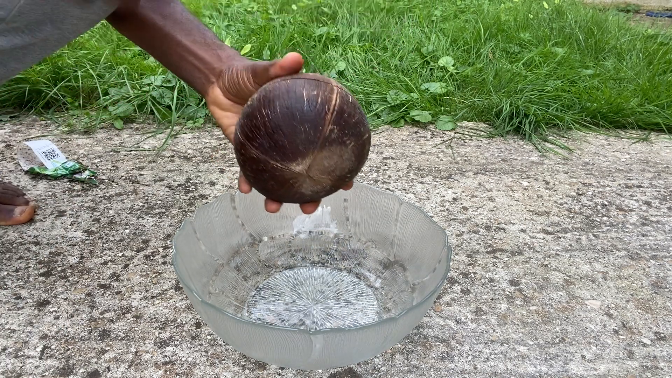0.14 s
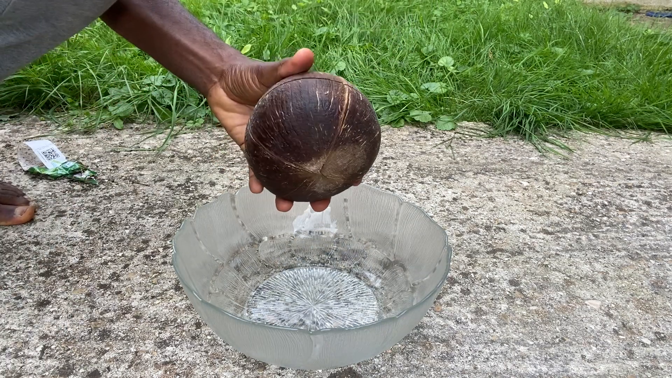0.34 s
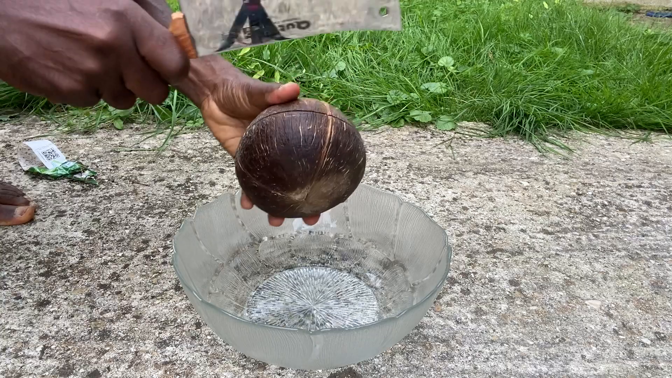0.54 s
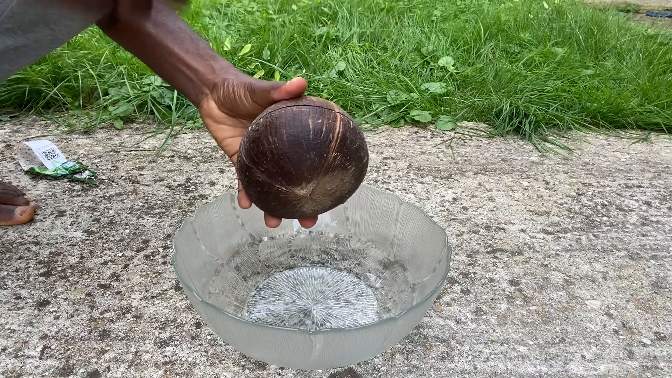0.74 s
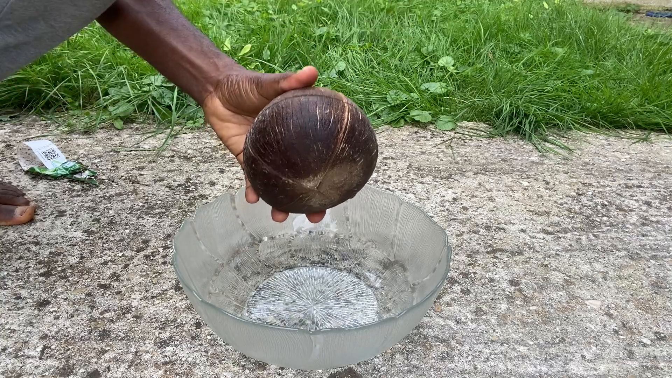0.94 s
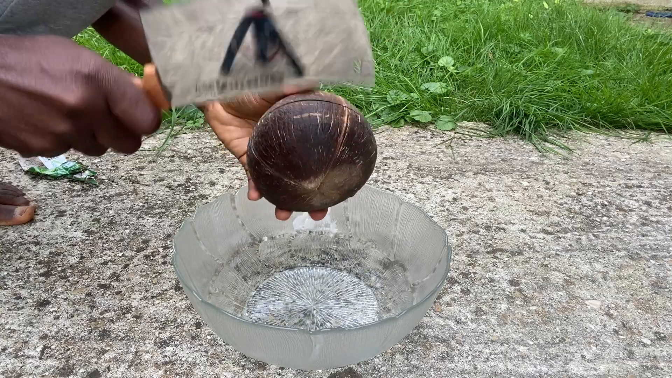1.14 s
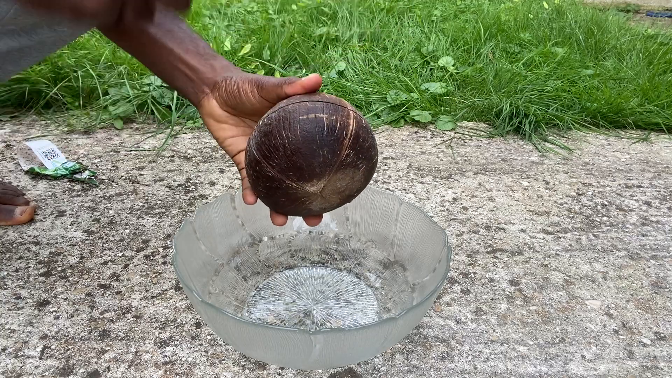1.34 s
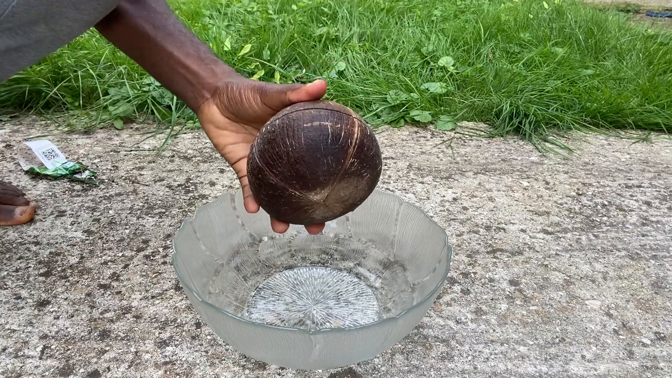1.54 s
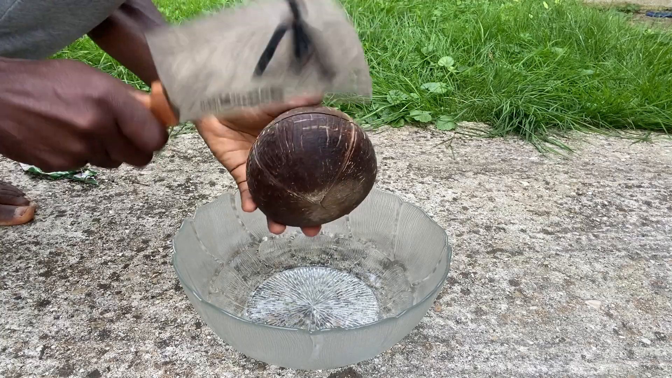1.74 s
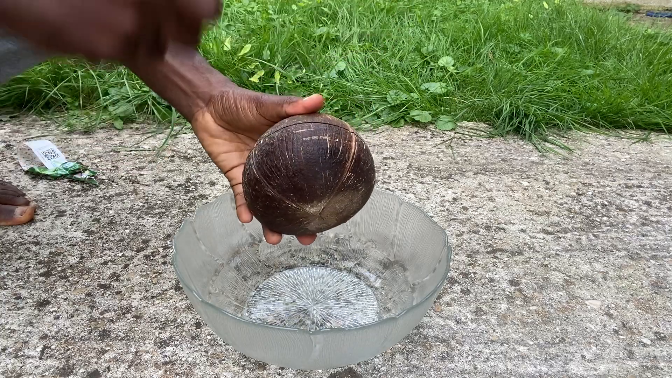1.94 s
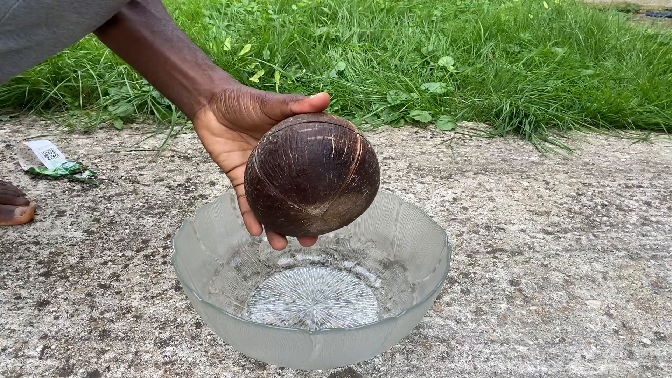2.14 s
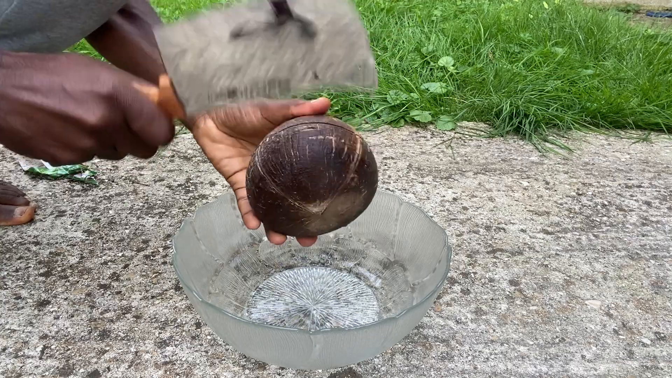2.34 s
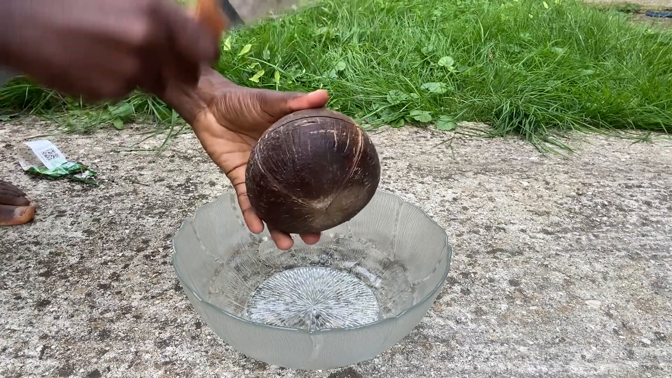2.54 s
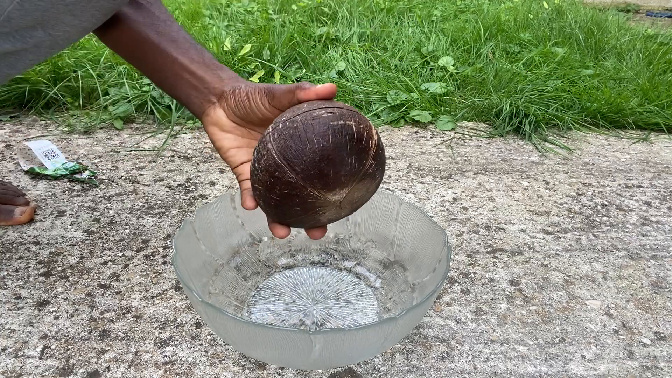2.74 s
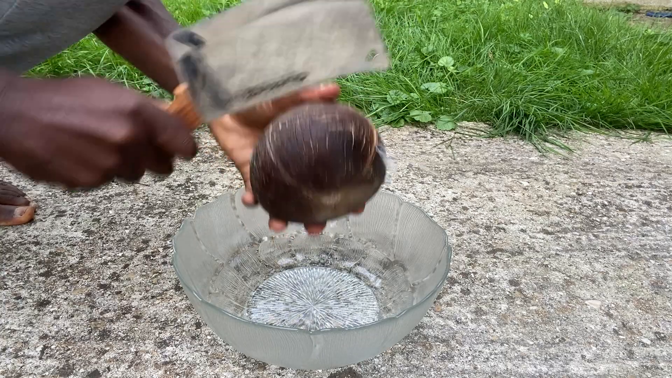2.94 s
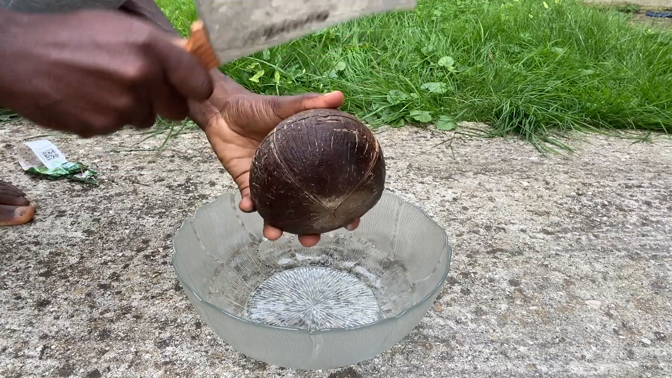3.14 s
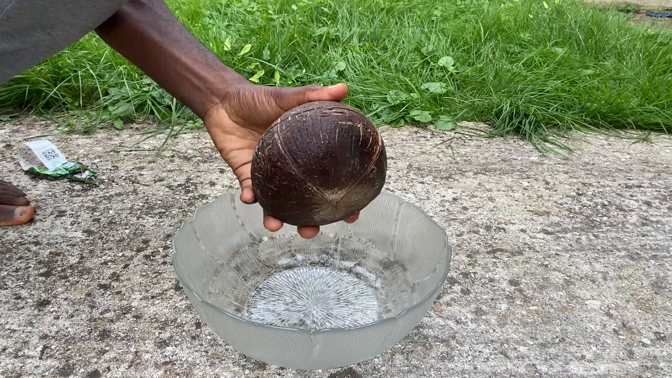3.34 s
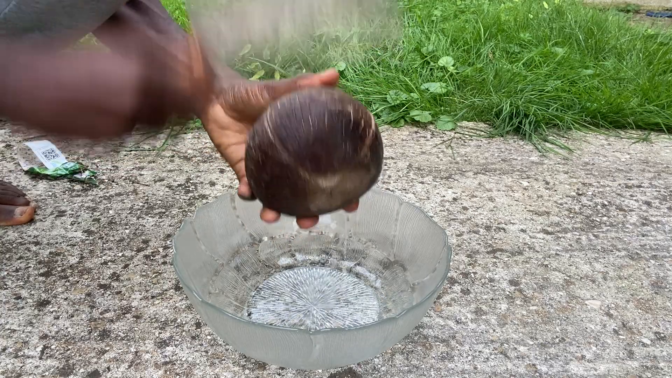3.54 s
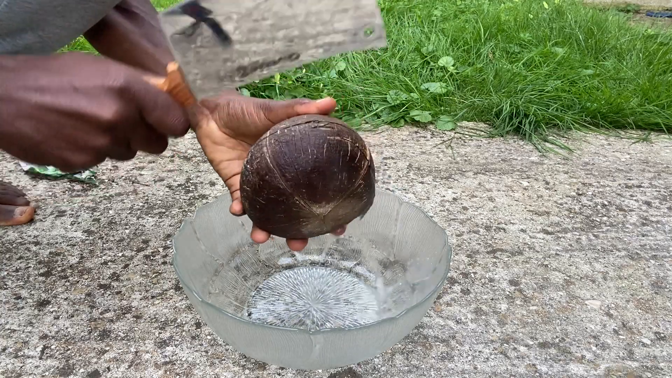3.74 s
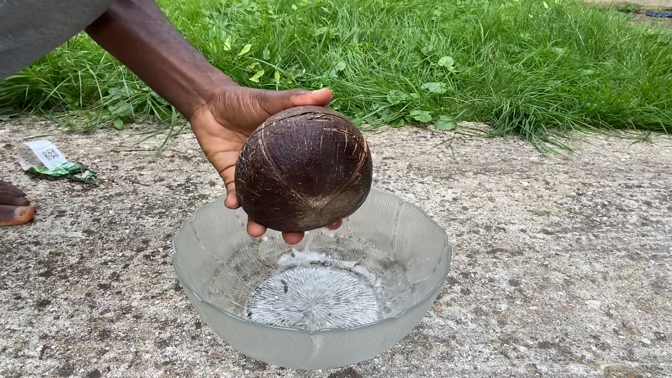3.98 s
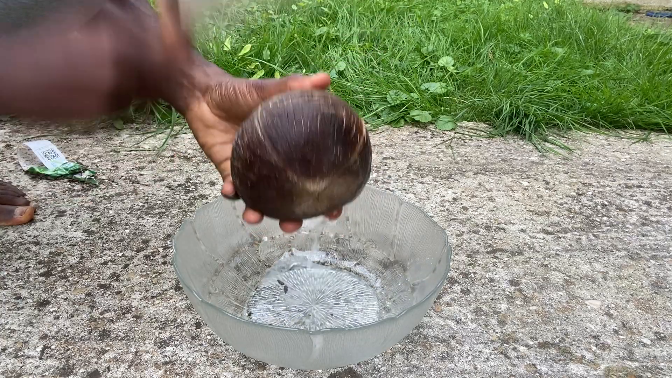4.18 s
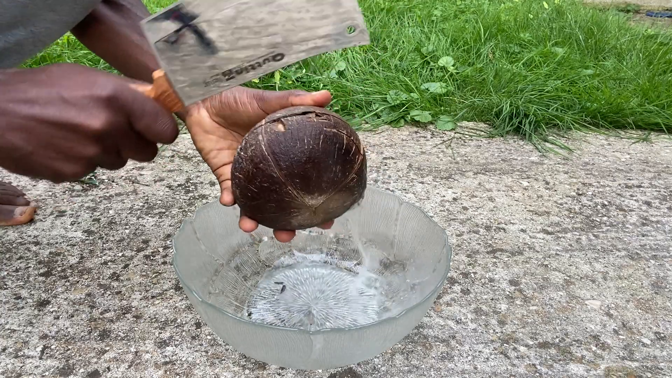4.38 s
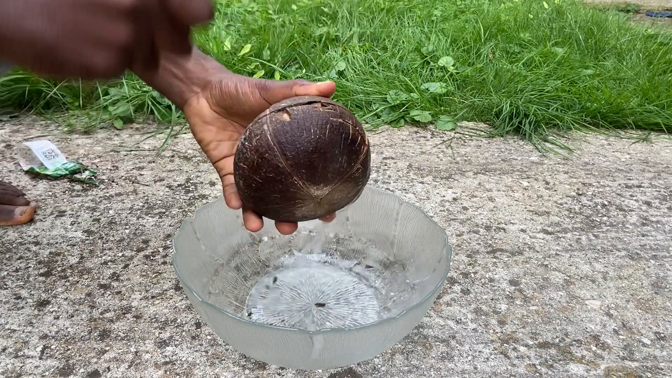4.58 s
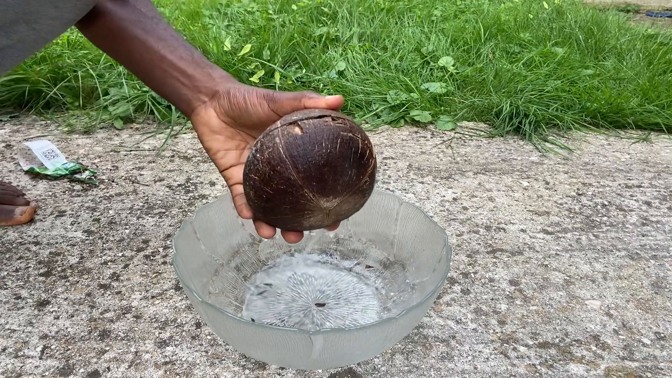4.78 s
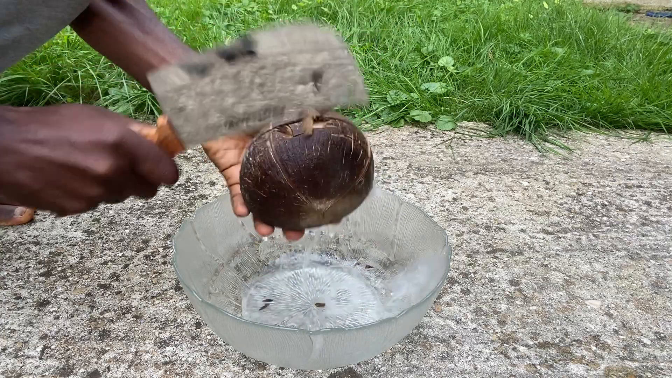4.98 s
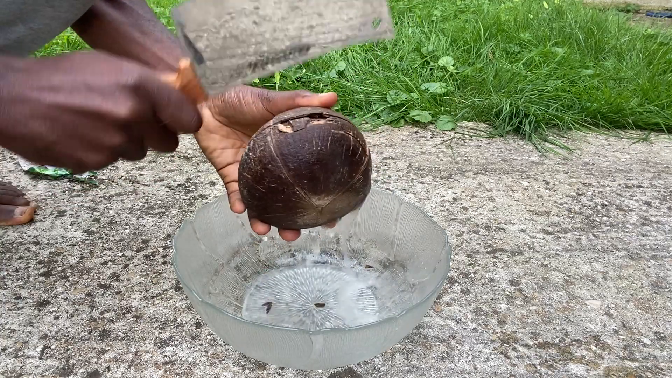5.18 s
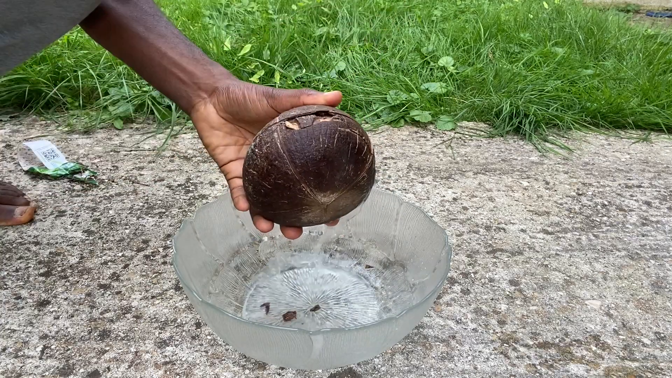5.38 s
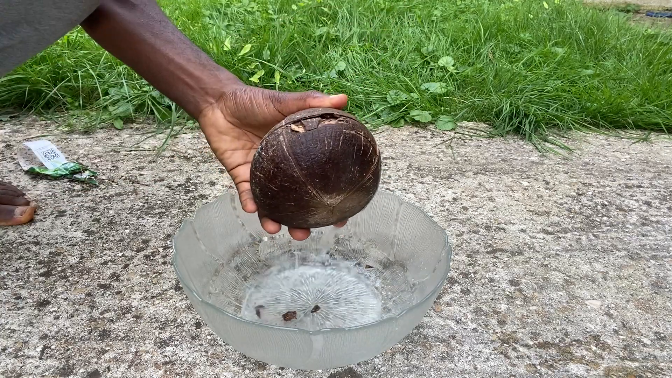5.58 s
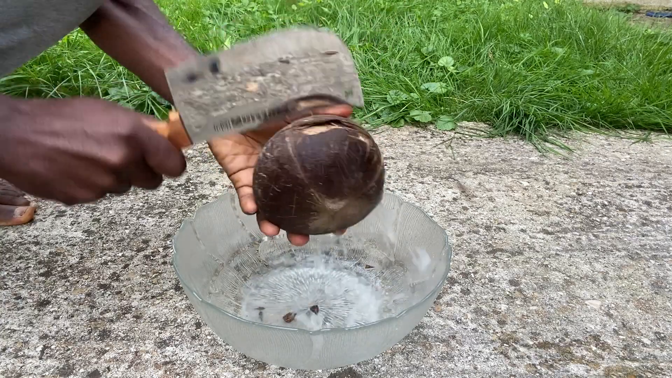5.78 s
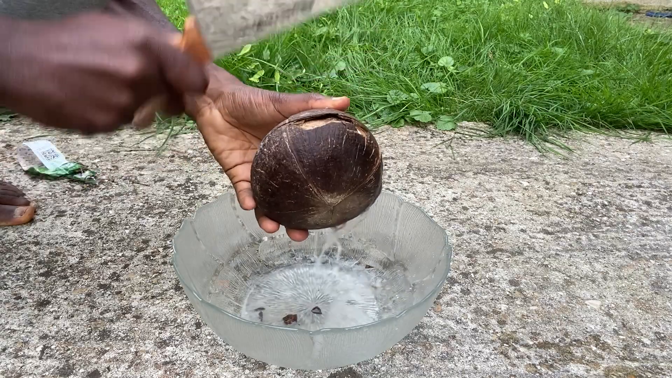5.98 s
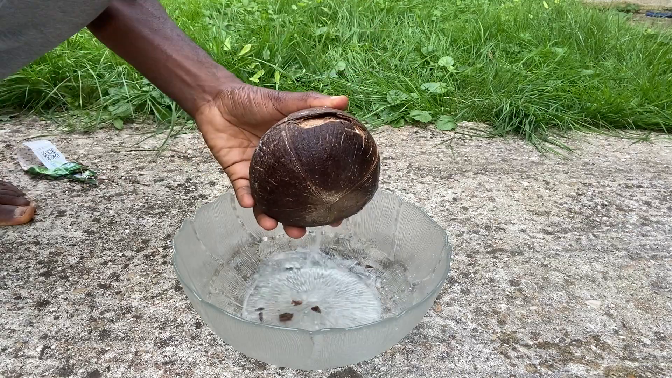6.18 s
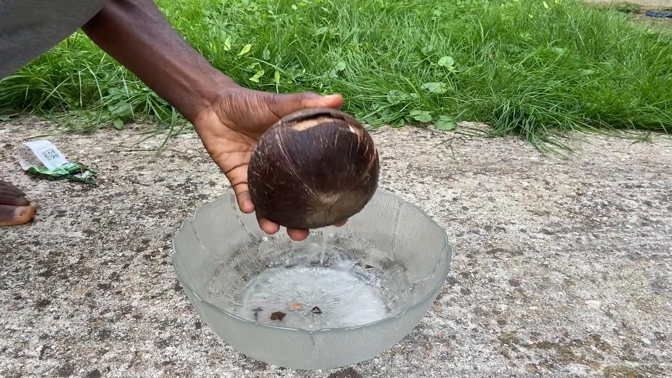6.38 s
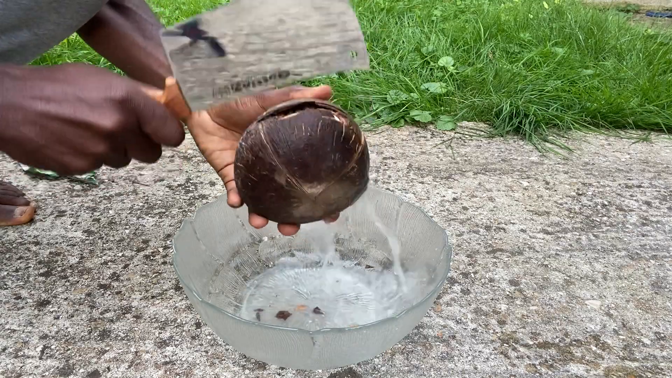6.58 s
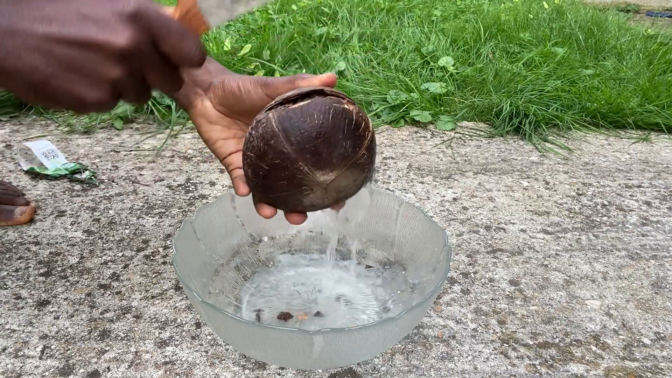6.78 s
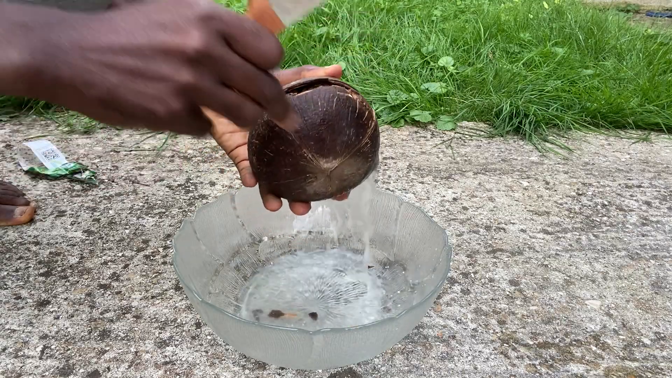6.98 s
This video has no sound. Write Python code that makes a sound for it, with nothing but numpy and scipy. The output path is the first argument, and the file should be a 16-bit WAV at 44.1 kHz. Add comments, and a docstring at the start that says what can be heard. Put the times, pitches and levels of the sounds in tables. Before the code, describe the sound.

A close outdoor scene over soft, swelling distant traffic rumble. The back of a steel cleaver knocks a hand-held coconut at about 0.5, 1.1 and 1.7 seconds: loud, sharp, woody cracks with a tight hollow note around 600 Hz and a faint steel ring. At 2.3 and 2.9 the note drops and loosens, with barely audible glass ticks afterward. Blows at 3.6, 4.2, 5.0, 5.7 and 6.5 sound deeper and more broken, each with a tiny rebound tap just after. From 3.7 onward chips clink in a glass bowl and water begins to spatter; a bright, strong clink and splash come near 5.2, more around 6.0. By 6 to 7 seconds fizzing droplets, smacks and small bubbly pips are nearly continuous. Each blow leaves a short open-air echo, and the background dips briefly after it.

```python
"""Distant traffic rumbles throughout, outdoors, as filtered noise that swells and sinks.
The back of a cleaver knocks a hand-held coconut ten times: noise, shell modes and decaying hollow notes.
As the shell splits the note drops; chips fall and ring the modes of a glass bowl below.
Water smacks and fizzes in the bowl as bursts and grains, with short pitched tones of bubbles and glass.
The steel rings and near surfaces echo each blow; the recorder's gain control ducks after it."""
import sys
import numpy as np
from scipy import signal
from scipy.fft import rfft, irfft, next_fast_len
from scipy.io import wavfile

SR = 44100
rng = np.random.default_rng(int(sys.argv[2]) if len(sys.argv) > 2 else 0)


def wav_out(sig):
    """Save sig, one row per channel (or a flat mono array), as 16-bit PCM at SR to the path in sys.argv[1]."""
    wavfile.write(sys.argv[1], SR, np.round(np.clip(np.atleast_2d(sig).T, -1, 1) * 32767).astype(np.int16))


def ratio(d):
    """dB to gain"""
    e = np.asarray(d, float) / 20
    return 10 ** e


N = 309537

# Blows of the blade. Each row: start in seconds, crack level in dB, note under the blade in Hz, its level in dB,
# free hollow note in Hz, its level in dB, knock in Hz, blade ring level in dB.
BLOWS = [(0.4727, -8.5, 623, -7.5, 656, -36.5, 2140, -41.5),
         (1.0612, -10, 645, -9.5, 650, -28, 2160, -30.5), (1.6752, -8, 632, -8, 612, -28, 1985, -39),
         (2.2839, -9.5, 443.4, -9, 238, -14.5, 2212, -45), (2.9402, -8, 518, -11, 152, -11, 2000, -44),
         (3.5721, -10, 450, -10.5, 160.6, -13.5, 3460, -47), (4.213, -8.5, 400, -11, 253, -18.5, 1746, -41),
         (4.9620, -7.5, 400, -9.5, 253.5, -16, 2270, -49.5),
         (5.7170, -8.5, 363, -7.5, 259.3, -7, 1787, -54), (6.4663, -9.5, 400, -10.5, 309, -15, 2193, -38)]
# The blade bounces back onto the split shell. Each row: start in seconds, crack level in dB, hollow note level in dB.
REBOUNDS = [(3.619, -25.5, -21.5), (4.254, -27, -24), (5.015, -33.5, -23), (5.7544, -18, -14),
            (6.504, -33, -31.5)]
# Spectrum of the crack. Each row: frequency in Hz, relative density in dB per Hz.
CRACK_SPECTRUM = [(130, -40.5), (220, -17.5), (563, -20), (1100, -9), (2030, -13.5), (2480, -11.5),
                  (3080, -9.5), (4740, -18), (8460, -14.5), (10500, -23), (11500, -26.5), (14000, -22),
                  (15100, -31.5), (16500, -71.5)]
# Modes of the shell. Each row: frequency in Hz, relative level in dB, T60 in seconds.
SHELL_MODES = [(1145, -5, 0.0081), (1223, -15, 0.13), (1680, -31.5, 0.05), (2100, -1.5, 0.02),
               (3100, -10, 0.0025), (4650, -16, 0.0072), (5200, -8, 0.035), (6130, -2.5, 0.0056),
               (8000, -25.5, 0.00098), (12500, -5, 0.0025)]
# Modes of the blade. Each row: frequency in Hz, relative level in dB, T60 in seconds.
BLADE_MODES = [(1717, -20, .4), (2300, -12, .2), (4868, -7, .5), (4866, -3, .16), (7850, -20, .4),
               (7900, 2, .07), (11800, -24, .35)]
# Chips landing on the glass. Each row: start in seconds, level of the wall modes in dB,
# level of the base modes in dB, brightness in dB per octave, tick level in dB.
CHIPS = [(2.48, -57.5, -65, 10, -54), (3.102, -82.5, -66, 10, -57), (3.172, -95, -70, 8.5, -57),
         (3.707, -55.5, -62, 6.5, -47), (3.756, -72, -58, 5, -59), (3.84, -105, -61.5, 5.5, -42),
         (3.962, -89, -65, 7, -52), (4.345, -52, -82, 9, -50), (4.372, -43, -68, 4, -49),
         (4.412, -84, -41.5, 1.5, -52), (4.44, -81, -49, -2.5, -61), (4.498, -74.5, -52, -0.5, -37),
         (4.553, -68, -58, -6, -39), (4.816, -91, -64.5, -18, -45), (5.165, -68.5, -39, 12, -16),
         (5.345, -82.5, -61.5, -1.5, -60), (5.574, -96, -66.5, 1, -68), (5.964, -52, -73, 2.9, -23.5),
         (6.014, -52.5, -74.5, 0.5, -27), (6.049, -74, -57.5, 3, -50), (6.595, -44.5, -58.5, 3, -40),
         (6.639, -59, -74.5, 7, -45), (6.793, -73, -58, -2, -31.5)]
# Modes of the glass bowl. Each row: frequency in Hz, level struck on the wall in dB, level struck on the base in dB,
# T60 in seconds, fall of pitch as the bowl fills in Hz per second.
BOWL_MODES = [(1378, -22, -32, .45, 0), (1935, -30, -14, .2, 60), (2920, -11, -24, .38, 0),
              (3482, -32, 1, .2, 130), (3849, 2, -30, .28, 0), (4221, -12, -30, .06, 0),
              (4908, 0, -22, .12, 0), (5600, -18, -14, .12, 0), (5916, -12, -12, .15, 0),
              (6048, -1, -22, .13, 0), (6277, -9, -22, .07, 0), (6772, -3, -12, .15, 0),
              (7250, -6, -13, .1, 0), (7345, -12, -9, .14, 0), (7915, -6, -11, .1, 0),
              (8470, -7, -11, .08, 0), (8645, -13, -9, .13, 0), (9114, -10, -18, .11, 0),
              (11390, -22, -16, .09, 0), (11640, -17, -22, .09, 0), (12540, -16, -22, .1, 0),
              (13400, -20, -30, .07, 0), (13800, -22, -30, .08, 0)]
# Chips on the rim set the whole bowl humming in its lowest mode. Each row: start in seconds, level in dB.
RIM_HUMS = [(2.481, -66.5), (4.372, -69), (5.165, -70.5), (5.962, -61), (6.595, -60.5)]
# Single smacks and thumps on the bowl, strong and faint. Each row: start in seconds, level in dB, centre in Hz.
SINGLE_SMACKS = [(0.928, -35, 6130), (1.488, -43.5, 2160), (2.655, -54, 1930), (2.735, -49.5, 10100),
                 (3.13, -43, 5700), (3.148, -54, 4510), (3.266, -56, 2000), (3.322, -59, 6060),
                 (3.945, -49, 13000), (3.99, -66, 4300), (4.123, -56, 9030), (4.146, -41, 9910),
                 (4.537, -43, 12500), (4.582, -49, 6000), (4.618, -44, 9500), (4.647, -41.5, 5350),
                 (4.838, -41, 12500), (4.894, -33.5, 12800), (5.166, -33, 1064), (5.205, -46, 4500),
                 (5.225, -13.5, 12500), (5.307, -43, 8570), (5.316, -45, 12960), (5.337, -40, 5800),
                 (5.378, -55, 4500), (5.401, -42.5, 6170), (5.424, -51, 7550), (5.446, -57, 8000),
                 (5.463, -51, 12500), (5.476, -33.5, 9800), (5.531, -47.5, 13120), (5.583, -41, 10000),
                 (5.596, -41, 8600), (5.606, -54, 5430), (5.635, -49, 3580), (5.932, -38, 12100),
                 (6.085, -46, 7410), (6.095, -47, 8000), (6.129, -28, 8000), (6.131, -48, 1800),
                 (6.141, -35, 7800), (6.163, -30, 6800), (6.163, -33.5, 3170), (6.165, -40.5, 960),
                 (6.213, -43.5, 7000), (6.298, -47, 7120), (6.335, -47, 6790), (6.363, -45.5, 8640),
                 (6.419, -54.5, 3520), (6.434, -40.5, 4800), (6.706, -44, 7100), (6.728, -55, 9300),
                 (6.744, -45, 8500), (6.762, -51, 6560), (6.776, -43, 11700), (6.838, -35, 12900),
                 (6.885, -45.5, 4000), (6.908, -44, 9900), (6.946, -42.5, 8000), (6.922, -48, 3140),
                 (6.968, -36.5, 4860), (6.989, -59, 8000), (6.796, -40, 7300), (7.002, -39, 8000)]
# Short pitched tones among the water: bubbles, and the glass base ringing near 1.8 kHz.
# Each row: start in seconds, level in dB, first pitch in Hz, rise in octaves, T60 in seconds.
PITCHED_TONES = [(4.612, -45.5, 1615, 1.05, 0.065), (4.818, -38, 2450, 0.12, 0.021),
                 (5.345, -28, 2880, 0.13, 0.016), (5.573, -34.5, 4300, 0.55, 0.012),
                 (6.048, -38.5, 1800, .02, 0.057), (6.61, -41, 1700, .05, 0.041),
                 (6.747, -39, 1480, 0.035, 0.033), (6.824, -43.5, 2080, .05, 0.049),
                 (6.804, -47, 3100, 0.04, 0.13), (6.805, -41, 1780, 0.02, 0.075),
                 (6.844, -42, 1734, 0.028, 0.079), (6.882, -32, 2680, 0.059, 0.038),
                 (6.885, -17, 2060, 0.046, 0.006), (6.92, -40.5, 2100, 0.11, 0.072),
                 (6.938, -44, 1790, 0.076, 0.029), (6.966, -35.5, 4620, 0.032, 0.025)]
# Spectrum of the echoes. Each row: frequency in Hz, relative density in dB per Hz.
ECHO_SPECTRUM = [(120, -23.5), (200, 3.5), (442, 0.5), (652, -10.5), (926, -24.5), (1770, -15.5),
                 (2300, -14), (3500, -16.5), (8490, -17.5), (10400, -22), (11400, -20), (13700, -23.5),
                 (16500, -76)]
# Reverberation of the late echoes. Each row: frequency in Hz, T60 in seconds.
ECHO_T60 = [(200, 0.36), (700, 0.62), (2000, 0.8), (5000, 0.62), (12000, 0.29)]
# Spectrum of the traffic. Each row: frequency in Hz, relative density in dB per Hz.
TRAFFIC_SPECTRUM = [(15, -42), (25, -15.5), (48, 2), (68, 7), (101, -7), (138, -5), (169, -12.5),
                    (440, -26.5), (1640, -38.5), (3660, -55), (5250, -65), (5970, -67), (12000, -78),
                    (15600, -97), (22000, -120)]
# Swells of the traffic. Each row: time in seconds, relative level in dB.
TRAFFIC_SWELL = [(0.0, -48.5), (0.47, -49), (0.68, -53), (0.92, -47), (1.2, -54.5), (1.5, -48),
                 (1.85, -57.5), (2.1, -55), (2.77, -59.5), (2.99, -56.5), (3.32, -59.5), (3.75, -55),
                 (3.95, -58), (5.14, -57.5), (5.79, -53.5), (6.2, -60), (7.02, -54)]
# Brightness of the traffic. Each row: time in seconds, tilt in dB per octave.
TRAFFIC_HAZE = [(0, 5.5), (1.7, 5), (2.3, 1.14), (7.02, 1.43)]
# Likeness of left and right in diffuse noise. Each row: frequency in Hz, correlation from 0 to 1.
LIKENESS = [(30, 0.85), (150, .82), (380, 0.25), (1000, 0.05), (4000, .1), (7500, 1), (12000, 1)]
# Phase lead of the left port over the right. Each row: frequency in Hz, lead in radians.
LEFT_LEAD = [(0, 0), (150, -.3), (300, -.6), (1100, -.45), (2000, -.7), (2700, -1.2), (4900, -1.7),
             (7000, -1.3), (7800, 0), (10400, 3.1), (16700, 10.7), (22050, 16)]

REBOUND_KNOCK_HZ = 1380
SPLINTER_S = 0.0082   # the sharp part of the crack
CONTACT_S, BITE_S = 0.00098, 0.00018   # the dent is held this long; the crack builds up
DENT_S, SPRING_S = .0032, .0065   # after first touch the shell is dented deepest, and springs back
WHOLE_HZ = 600   # the unsplit shell hums above this
THUD_DB, MURMUR_DB = -21, -25   # relative to the blow's level
SLAP_S, SLAP_DB = .0165, -20.5   # the crack returns once from a near wall
GRIP_FLUTTER_DB = 3   # the shifting grip makes the ring uneven
RATTLE_S, RATTLE_DB = 0.006, -8   # a chip touches the glass again about this much later
HUM_HZ, HUM_T60_S = 788, 1.2
LOADED_S = 3.75   # from here on water gathers in the bowl and lowers the base modes
SPLIT_S = 3.5   # blows after this shake water out
FALL_S, GUSH_T60_S = .15, 1.6   # each gush lands late and dies
LEAK_PER_BLOW = .08   # the steady leak grows by this share of a gush
# Rates are for a flow of 1.
PATTER_PER_S, PATTER_DB = 70, -72.5   # drops keep the base modes sounding
DROPS_PER_S, DROP_DB, DROP_SPREAD_DB = 28, -57, 4.5   # random drops
FROTH_PER_S, FROTH_DB = 25, -64   # random bubbles; the weakest level
BUBBLE_ATTACK_S = 0.004
DROPLETS_PER_S, DROPLET_DB, DROPLET_SPREAD_DB = 5000, -78, 3
DROPLET_FOLLOWS = .7   # share of the flow's dB swing
ECHO_DELAY_S, ECHO_LUMPS_DB = 0.0035, 2.5   # first return; uneven arrival
RUMBLE_SHARE_DB = 0.4345   # swells are mostly bass: dB per octave duller for each dB louder
GROUND_S, GROUND_DB = (.00104, .00165), -13   # the bounce off the ground reaches each port at its own time


def at_hz(points, hz):
    """Spectral interpolation: reads a table on a log-frequency axis."""
    table = np.array(points)
    return np.interp(np.log(hz), np.log(table[:, 0]), table[:, 1])


def in_time(rows):
    """Linear interpolation in time: gives each column of a curve one value a sample."""
    s, *columns = np.transpose(rows)
    return [np.interp(np.arange(N) / SR, s, c) for c in columns]


def wander(step):
    """Slow random modulation: unit normal values every step samples, joined by lines."""
    count = N // step + 2
    return np.interp(np.arange(N) / step, np.arange(count), rng.standard_normal(count))


def clicks(s, sizes):
    """Impulsive excitation: impulses of given sizes at given times."""
    out = np.full(N, 1e-18)
    np.add.at(out, np.round(np.asarray(s) * SR).astype(int), sizes)
    return out


def ring(x, hz, t60):
    """Damped resonance: a unit click sets a sine of height about 1 ringing."""
    r, w = ratio(-60 / (t60 * SR)), 2 * np.pi * hz / SR
    return signal.lfilter([0, np.sin(w)], [1, -2 * r * np.cos(w), r * r], x)


def fade(x, t60):
    """Exponential decay: each click becomes a dying envelope."""
    return signal.lfilter([1], [1, -ratio(-60 / (t60 * SR))], x)


def add(out, s, sound):
    """Superposition: mixes a short sound in at time s."""
    i = round(s * SR)
    out[i:i + len(sound)] += sound[:N - i]


def noise_bands(low_hz):
    """Diffuse field: half-octave bands of stereo noise of equal power per Hz, with centre pitch."""
    edges = low_hz * 2 ** np.arange(0, np.log2(17500 / low_hz), .5)
    # neighbouring bands use independent noise
    white = rng.standard_normal((2, 2, N))
    for k, (low, high) in enumerate(zip(edges, edges[1:])):
        band_pass = signal.butter(2, [low, high], "band", fs=SR, output="sos")
        mid, side = signal.sosfilt(band_pass, white[k % 2])
        hz = np.sqrt(low * high)
        alike = np.clip(at_hz(LIKENESS, hz), 0, 1)
        yield hz, np.sqrt(1 + alike) * mid + np.sqrt(1 - alike) * side * [[1], [-1]]


def strokes():
    """Repeated impact: blows and rebounds in one list; a rebound keeps the notes of its blow."""
    rows = [b[:7] for b in BLOWS]
    for s, db, hollow_db in REBOUNDS:
        blow = [b for b in BLOWS if b[0] < s][-1]
        rows.append((s, db, blow[2], db - 4.0, blow[4], hollow_db, REBOUND_KNOCK_HZ))
    return rows


def coconut():
    """Impact and cavity resonance: splintering contact drives shell, knock and pressed note; the cavity rings on."""
    out, t = np.zeros(N), np.arange(round(.3 * SR)) / SR
    hz = np.maximum(np.fft.rfftfreq(len(t), 1 / SR), 1)
    colour = ratio(at_hz(CRACK_SPECTRUM, hz))

    def swell(late, rise_s):
        """Gaussian onset: rises to 1 when late reaches 0, then holds."""
        return np.exp(-(np.minimum(late, 0) / rise_s) ** 2)

    for s, db, pressed_hz, pressed_db, hollow_hz, hollow_db, knock_hz in strokes():
        noise = rng.standard_normal((2, len(t)))
        strengths = rng.normal(0, 2.4, len(SHELL_MODES))
        touch_s = min(ratio(.4 * (db + 9)), 1)   # a factor: light rebounds touch briefly
        pressed = t < SPLINTER_S * touch_s
        force = (1 - np.exp(-t / BITE_S)) ** 2

        crack = irfft(rfft(noise[0]) * colour, len(t))
        crack_decay = ratio(-60 * t / 0.026) * pressed + ratio(-24 - 60 * t / 0.03)
        crack = crack / crack.std() * force * crack_decay

        contact = noise[0] * (t < .003) / np.sqrt(0.0051 * SR)
        shell = sum(ratio(mode_db + x) * ring(contact, mode_hz, t60)
                    for (mode_hz, mode_db, t60), x in zip(SHELL_MODES, strengths))
        shell = shell * np.where(pressed, 1, .25)   # the hand damps the shell as it gives way

        knock = force * np.sin(2 * np.pi * knock_hz * t) * ratio(-60 * t / 0.022)
        knock = knock * np.where(pressed, 1, .3)

        dent, spring = t - DENT_S * touch_s, t - SPRING_S * touch_s
        note = -swell(dent, 0.0015) * np.cos(2 * np.pi * pressed_hz * dent)
        note = note * ratio(-60 * np.maximum(dent - CONTACT_S, 0) / 0.012)
        # the free note dies by 60 dB in 8.5 cycles
        hollow = -swell(spring, 0.0025) * np.cos(2 * np.pi * hollow_hz * spring)
        hollow = hollow * ratio(-60 * np.maximum(spring, 0) * hollow_hz / 8.5)

        # the sloshing water keeps the note murmuring; a split shell hums far less
        murmur = ring(noise[1] * ratio(-60 * t / 0.55), hollow_hz, 16.0 / hollow_hz)
        murmur = murmur / np.abs(murmur).max() * min(hollow_hz / WHOLE_HZ, 1) ** 1.5

        # the palm takes the thud
        thud = swell(spring, 0.003) * np.sin(2 * np.pi * 125 * spring)
        thud = thud * ratio(-60 * np.maximum(spring, 0) / 0.068)
        tick = np.diff(noise[1], prepend=0) * ratio(-60 * t / 0.004)   # steel meets the hard skin first

        bright = ratio(1.0) * crack + ratio(-2.5) * shell + ratio(-5) * tick
        body = ratio(-2.0) * knock + ratio(THUD_DB) * thud + ratio(MURMUR_DB) * murmur
        notes = ratio(pressed_db) * note + ratio(hollow_db) * hollow
        add(out, s, ratio(db) * (bright + body) + notes)
        add(out, s + SLAP_S, ratio(db + SLAP_DB) * np.diff(bright))
    return out


def blade():
    """Modal decay: the steel sings on after each blow, damped by the grip."""
    rows = np.array(BLOWS)
    shares_db = rng.normal(0, 1.5, (len(rows), len(BLADE_MODES)))
    out = 0
    for k, (hz, db, t60) in enumerate(BLADE_MODES):
        strikes = clicks(rows[:, 0], ratio(rows[:, 7] + db + shares_db[:, k]))
        out = out + ratio(GRIP_FLUTTER_DB * wander(400)) * ring(strikes, hz, t60)
    return out


def flow():
    """Discharge and decay: water reaching the bowl; each gush adds 1 and dies, over a growing leak."""
    s = np.array([b[0] for b in BLOWS if b[0] > SPLIT_S]) + FALL_S
    landed = clicks(s, np.ones(len(s)))
    return fade(landed, GUSH_T60_S) + LEAK_PER_BLOW * np.cumsum(landed) + 1e-6


def smacks(s, db, hz, cycles):
    """Resonant filtering: each landing is a short noise burst passed twice through a broad resonance."""
    out, t = np.zeros(N), np.arange(round(.03 * SR)) / SR
    for start, level_db, centre in zip(s, db, hz):
        burst = rng.standard_normal(len(t)) * ratio(-60 * t / .006)
        once = ring(burst, centre, cycles / centre)
        tick = np.diff(ring(once, centre, cycles / centre))
        add(out, start, ratio(level_db) * tick / np.abs(tick).max())
    return out


def bowl():
    """Modal excitation: a chip strikes wall and base modes, then rattles once more; water loads the base modes."""
    s, wall_db, base_db, bright_db, tick_db = np.transpose(CHIPS)
    shape = (len(s), len(BOWL_MODES), 2)
    shares = ratio(rng.normal(0, 1.8, shape)) * rng.choice([-1, 1], shape)
    again = s + RATTLE_S * rng.uniform(0.54, 1.6, len(s))
    out = smacks(s, tick_db, np.full(len(s), 6500.), cycles=1.3)
    hum_s, hum_db = np.transpose(RIM_HUMS)
    out += ring(clicks(hum_s, ratio(hum_db)), HUM_HZ, HUM_T60_S)
    drop_lands = rng.random(N) < PATTER_PER_S * np.minimum(flow(), 1) / SR
    patter = ratio(PATTER_DB) * rng.standard_normal(N) * drop_lands
    filling_s = np.maximum(np.arange(N) / SR - LOADED_S, 0)
    for k, (hz, on_wall_db, on_base_db, t60, sag_hz) in enumerate(BOWL_MODES):
        sizes = ratio(wall_db + on_wall_db) + ratio(base_db + on_base_db)
        sizes = sizes * ratio(7 + bright_db * np.log2(max(hz, 2900) / 4000))
        rattle = ratio(RATTLE_DB) * min(hz / 7000, 1) ** 2   # weaker in the low modes
        strikes = clicks(s, sizes * shares[:, k, 0]) + clicks(again, sizes * shares[:, k, 1] * rattle)
        if sag_hz:
            strikes = strikes + patter * ratio(on_base_db)
        # modes come in beating pairs
        for share, detune, shorter in ((.8, 1, 1), (.3, 1.007, .5)):
            if sag_hz:
                # a rotating phasor lets a ringing mode sink in pitch
                turn = np.exp(2j * np.pi * np.cumsum(hz - sag_hz * filling_s) * detune / SR)
                out += share * (turn * fade(strikes / turn, shorter * t60)).imag
            else:
                out += share * ring(strikes, hz * detune, shorter * t60)
    return out


def pitched_tones(rows):
    """Damped oscillation: each short tone is a decaying sine whose pitch rises, then holds."""
    out, t = np.zeros(N), np.arange(round(.1 * SR)) / SR
    for s, db, hz, octaves, t60 in rows:
        pitch = hz * 2 ** (octaves * np.minimum(t / (.45 * t60), 1))
        # the surface wobbles
        pitch = pitch * (1 + 0.012 * np.interp(t, np.linspace(0, .1, 40), rng.standard_normal(40)))
        envelope = ratio(db - 60 * t / t60) * (1 - np.exp(-t / BUBBLE_ATTACK_S))
        add(out, s, envelope * np.sin(2 * np.pi * np.cumsum(pitch) / SR))
    return out


def droplets(wet):
    """Granular excitation: random droplets spatter and fizz in fourteen narrow bands."""
    out = np.zeros(N)
    sizes_db = DROPLET_DB + DROPLET_SPREAD_DB * np.minimum(rng.exponential(1, N), 4)
    sizes = ratio(sizes_db) * wet ** DROPLET_FOLLOWS
    sizes = sizes * (rng.random(N) < DROPLETS_PER_S * wet / SR)
    pitches, dealt = np.geomspace(4000, 14500, 14), rng.integers(0, 14, N)
    for k, hz in enumerate(pitches):
        grains = ring(sizes * (dealt == k) + 1e-18, hz, 14.0 / hz)
        out += ring(grains, hz, 4.0 / hz) * hz / 8000   # a second pass softens the start
    return out


def water():
    """Random arrivals: smacks, pitched tones and fizzing droplets, the random ones denser in a gush."""
    wet = flow()

    def arrivals(per_s):
        """Thinning: keeps random rows at a rate that follows the flow."""
        rows = rng.random((700, 4))   # about 100 candidates a second
        return rows[rows[:, 1] < per_s / 100 * wet[(rows[:, 0] * (N - 1)).astype(int)]]

    drops, froth = arrivals(DROPS_PER_S), arrivals(FROTH_PER_S)
    drops_db = DROP_DB - DROP_SPREAD_DB * np.log(drops[:, 2] + 0.015)
    out = smacks(*np.transpose(SINGLE_SMACKS), cycles=2.5)
    out += smacks(drops[:, 0] * N / SR, drops_db, 5500 * 2.2 ** drops[:, 3], cycles=2.0)
    # among random bubbles the louder ones rise further
    random_bubbles = [(s * N / SR, FROTH_DB + 8 * a, 1500 * 3 ** b, 0.3 * a, .025) for s, _, a, b in froth]
    return out + pitched_tones(PITCHED_TONES + random_bubbles) + droplets(wet)


def echoes(small):
    """Reverberant decay: ground and walls nearby return blows and small hits as wide noise, dying band by band."""
    rows = np.array(strokes())
    hits = clicks(rows[:, 0] + ECHO_DELAY_S, ratio(rows[:, 1]))
    landings = fade(np.abs(small), .06) * ratio(-56)
    out = 0
    for hz, band in noise_bands(153.6):
        t60 = at_hz(ECHO_T60, hz)
        early = ratio(-0.5) * fade(hits, 0.2 * t60)
        late = ratio(-20.0) * fade(hits, t60)
        level = early + late + landings * min(hz / 3000, 1) ** 2
        lumps_db = ECHO_LUMPS_DB * wander(300)
        out = out + ratio(at_hz(ECHO_SPECTRUM, hz) + lumps_db) * band * level
    return ratio(2) * out


def traffic():
    """Filtered noise: far road noise, mostly rumble, swelling as vehicles pass."""
    (level_db,), (haze_db,) = in_time(TRAFFIC_SWELL), in_time(TRAFFIC_HAZE)
    tilt_db = haze_db - RUMBLE_SHARE_DB * (level_db + 56.5)
    plain, out = 0, 0
    for hz, band in noise_bands(25):
        band = ratio(at_hz(TRAFFIC_SPECTRUM, hz)) * band
        plain = plain + band
        out = out + band * ratio(tilt_db * np.log2(hz / 100))
    return ratio(level_db + 6.0) * out / plain.std()


def scene():
    """Superposition and phase difference: everything reaches two ports that differ in phase."""
    small = bowl() + water()
    near = coconut() + blade() + small
    bounce = np.array([np.roll(near, round(s * SR)) * ratio(GROUND_DB) for s in GROUND_S])
    left, right = (near + bounce) * ratio([[.2], [-.2]]) + echoes(small) + traffic()
    size = next_fast_len(N)
    lead = np.interp(np.fft.rfftfreq(size, 1 / SR), *np.transpose(LEFT_LEAD))
    left = irfft(rfft(left, size) * np.exp(1j * lead), size)[:N]
    return np.array([left, right])


def top_cut(x):
    """Nothing passes above the cut-off."""
    return signal.sosfilt(signal.butter(12, 17140, fs=SR, output="sos"), x)


def record(dry):
    """Dynamic compression: gain ducks after loud peaks and recovers, peaks are rounded, both band ends are cut."""
    level_db = 20 * np.log10(np.abs(dry).max(axis=0) + 1e-9)
    climb = 90 * np.arange(N) / SR   # the held peak falls at 90 dB per second
    held_db = np.maximum.accumulate(level_db + climb) - climb
    over_db = np.maximum(held_db + 19.5, 0)
    r = np.exp(-1 / (0.051 * SR))   # smoothing time constant of 51 ms
    x = dry * ratio(-.35 * signal.lfilter([1 - r], [1, -r], over_db))
    x = .9 * np.tanh(x / .9)
    x = signal.sosfilt(signal.butter(2, 42, "high", fs=SR, output="sos"), x)
    x = signal.sosfilt(signal.cheby2(10, 60, 17200, fs=SR, output="sos"), x)
    return top_cut(x)


dry = scene()
out = record(dry)
wav_out(out)
```